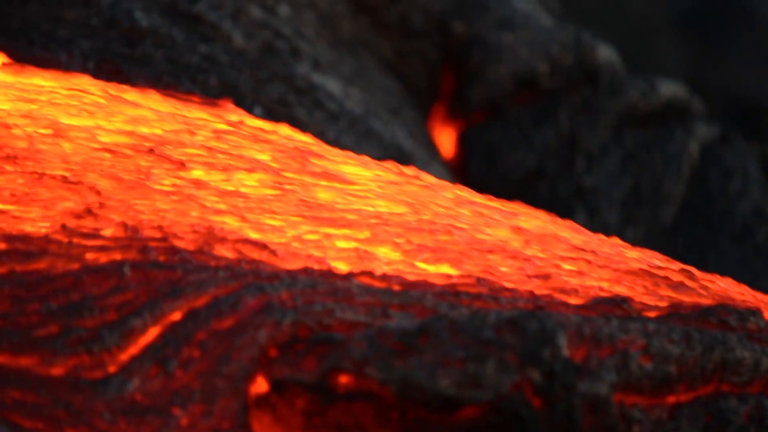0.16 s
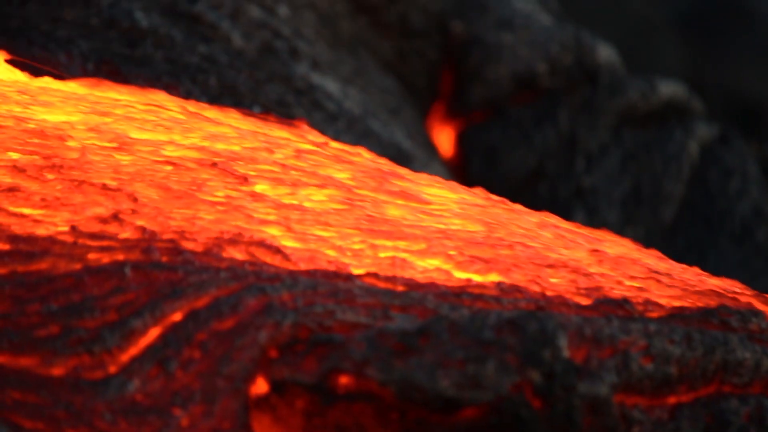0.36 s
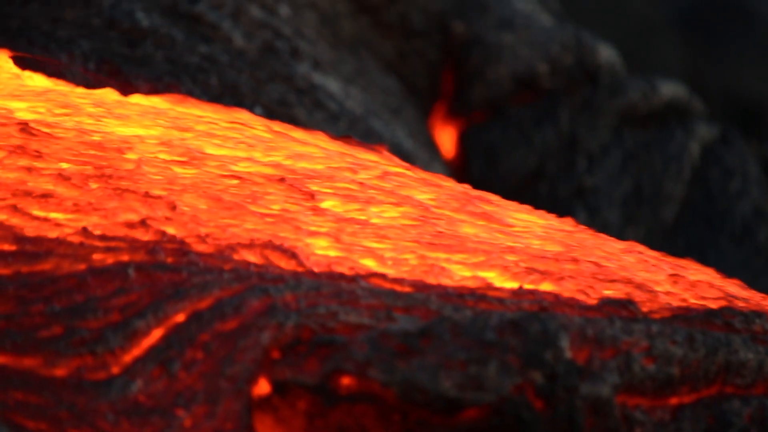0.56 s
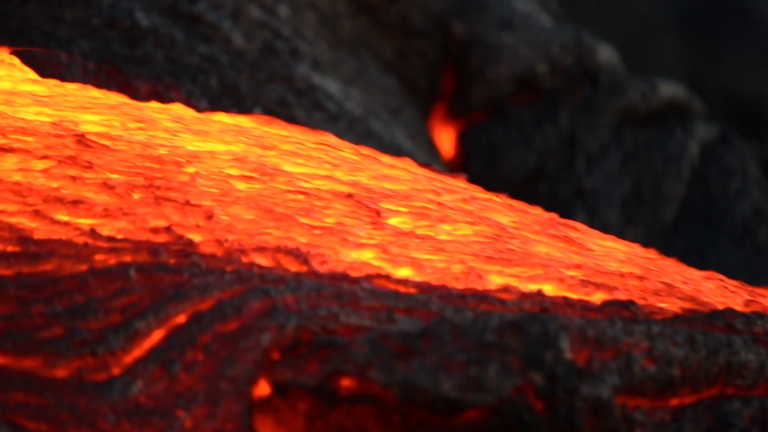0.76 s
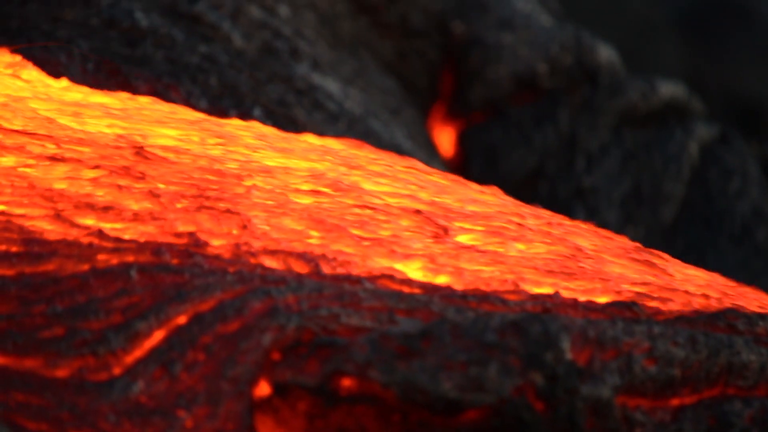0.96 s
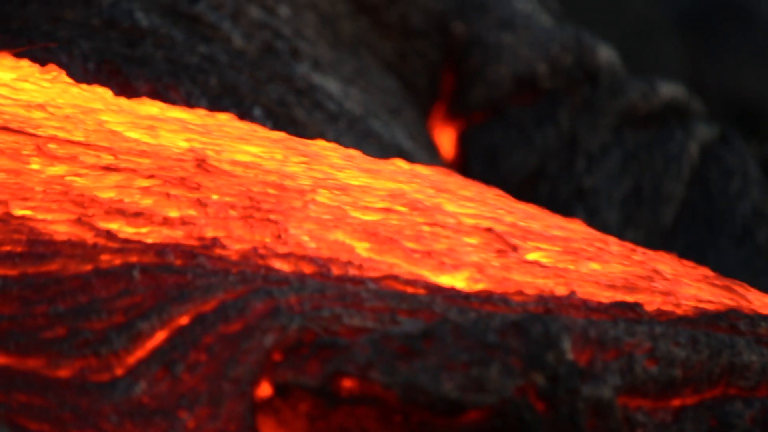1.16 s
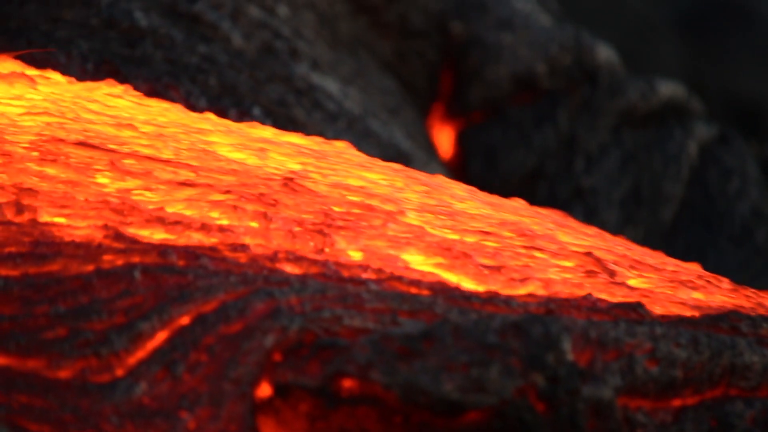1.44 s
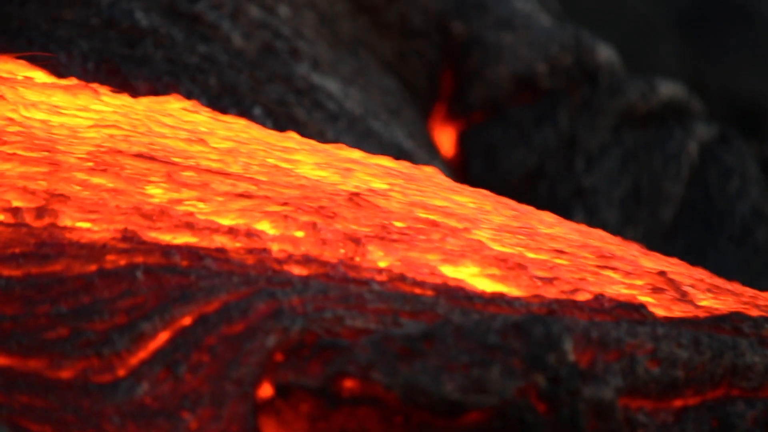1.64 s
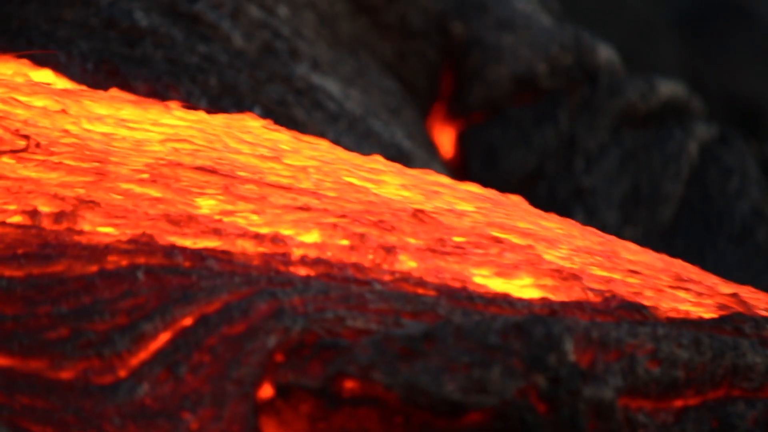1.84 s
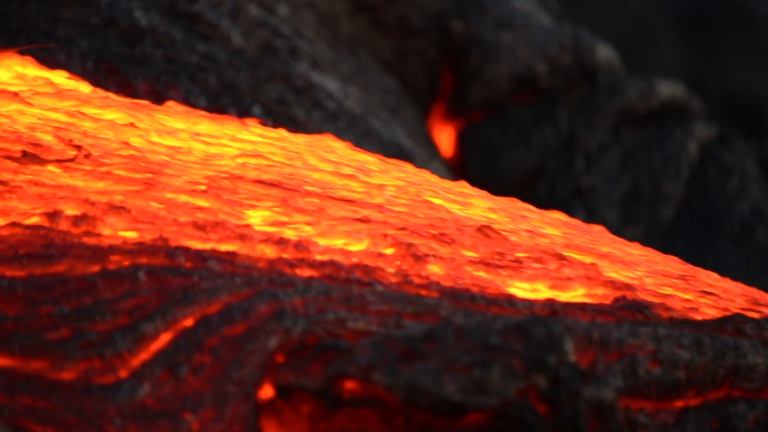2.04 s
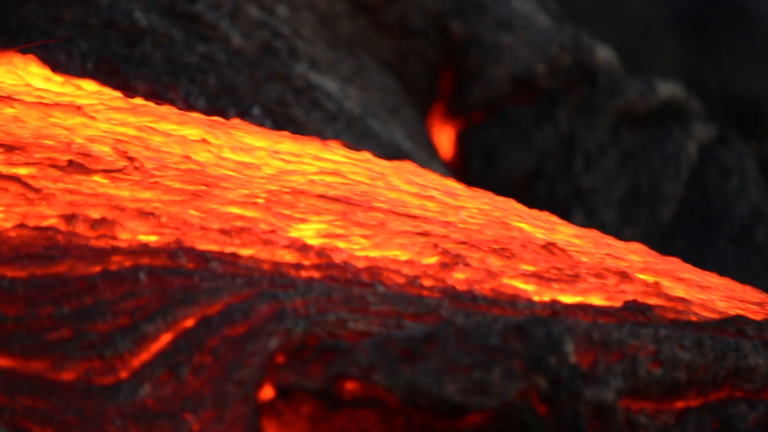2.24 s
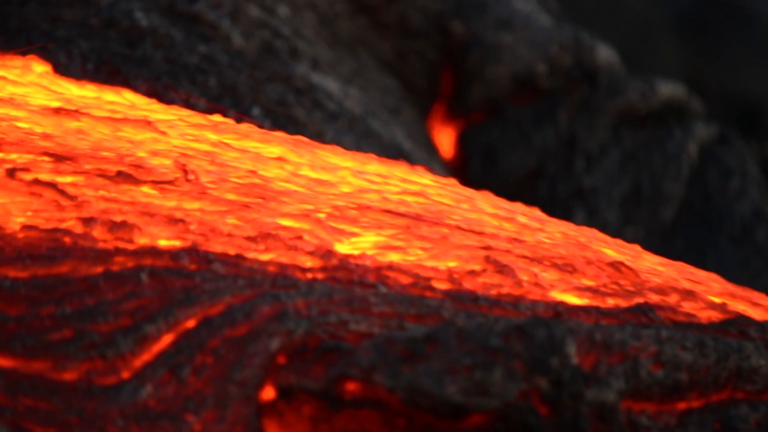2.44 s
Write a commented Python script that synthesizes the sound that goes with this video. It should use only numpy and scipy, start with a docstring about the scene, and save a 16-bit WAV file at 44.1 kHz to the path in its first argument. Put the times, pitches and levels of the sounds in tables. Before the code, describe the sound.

Brittle glassy lava crust clicks and snaps irregularly close by, with faint hiss and low wind buffeting

```python
"""Close to a lava flow in the open: the cooling glassy crust snaps in short dry cracks.
Each crack is an impulse, a noise burst and a rattle, passed through filters at its own pitch.
Under them lie tiny ticks, made of random short noise bursts, and a faint hiss of shaped noise.
Gusty wind buffets the microphone as a deep rumble: low noise whose level rises and falls."""
import sys
import numpy as np
from scipy import signal
from scipy.fft import rfft, irfft
from scipy.io import wavfile
from scipy.ndimage import uniform_filter1d

SR = 44100
rng = np.random.default_rng(int(sys.argv[2]) if len(sys.argv) > 2 else 0)


def makeup_ratio(level_db):
    """Linear amplitude ratio for a level in decibels (20 dB per factor of ten)."""
    decades = np.asarray(level_db, float) / 20
    return 10 ** decades


def materialize(psi):
    """Save the field psi as 16-bit PCM at rate SR to the path in sys.argv[1].

    A 1-D psi becomes a single channel; in a 2-D psi each row is a channel.
    """
    bounded = np.clip(np.atleast_2d(psi).T, -1, 1)
    quanta = np.round(bounded * 32767).astype(np.int16)
    wavfile.write(sys.argv[1], SR, quanta)


N = 113778  # length of the scene in samples

# Single snaps of the crust; the level is before CRACK_BOOST_DB, the edge is against the body,
# the length is before DECAY_SHARE: start_s [s], level_db [dB], pitch_hz [Hz], edge_db [dB], length_ms [ms]
CRACK_EVENTS = [(0.012, -35, 5800, 0, 1.5), (0.0175, -49, 6100, -11, 4.2), (0.0303, -49, 4500, -13, 4.7),
                (0.0422, -48.5, 6400, -8, 5.6), (0.05, -47, 5400, -1, 3), (0.089, -56, 4870, -16, 0.46),
                (0.1193, -37.5, 4500, -15, 0.23), (0.1232, -38.5, 7100, -2, 1.2),
                (0.13, -54, 6700, -13, 1.9), (0.15, -52, 3870, 2, 2), (0.2124, -35, 4300, -1, 0.15),
                (0.2414, -41, 3200, -10, 1.3), (0.2678, -49, 6800, -11, 0.53),
                (0.307, -50.5, 4100, -13, 2.3), (0.3511, -48, 2400, -22, 3.1), (0.3974, -51, 3730, -3, 1.3),
                (0.4122, -51, 4900, -20, 0.9), (0.4642, -27, 4400, 4, 0.21), (0.4707, -52, 6100, 1, 0.9),
                (0.4756, -55, 4000, 9, 2.8), (0.482, -50, 7400, 0, 1.4), (0.4886, -52, 5300, 4, 1.0),
                (0.5574, -46.5, 5130, 3, 0.9), (0.6262, -45, 6600, -3, 1.1), (0.61, -52, 7100, -14, 0.8),
                (0.739, -53, 5500, -7, 0.8), (0.673, -51, 5100, -16, 1.0), (0.6878, -43, 5360, -2.5, 0.52),
                (0.709, -52, 5600, -5, 1.7), (0.743, -49, 5300, -12, 0.98), (0.7539, -47, 3700, -3, 1.3),
                (0.7756, -55, 5100, 1, 3.7), (0.791, -51, 4400, -4, 2.1), (0.813, -50, 5000, -16, 0.77),
                (0.8478, -47, 3600, -1, 1.2), (0.869, -51.5, 3040, -3, 5), (0.8862, -48, 2670, 7, 2.7),
                (0.9378, -43.5, 4800, 16, 0.9), (0.945, -57, 5600, -3, 4.7), (0.954, -44, 4650, -5, 2.2),
                (0.974, -46.5, 5100, -13, 3.6), (0.978, -51, 6100, 7, 2.4), (1.035, -50, 6700, -1, 0.9),
                (1.063, -42.5, 6800, -13, 0.3), (1.0642, -36.5, 5330, -3.5, 0.2),
                (1.0674, -54.5, 2500, -21, 0.48), (1.0955, -40, 7000, -3, 0.15),
                (1.1115, -30.5, 4530, -14, 0.32), (1.165, -52, 4500, 3, 1.3), (1.2155, -46, 4430, -15, 0.7),
                (1.2462, -47, 6550, -9, 0.7), (1.3493, -30, 3260, -8, 0.78), (1.356, -48, 5800, -3, 2.1),
                (1.355, -32.5, 7460, -15, 0.86), (1.3576, -41, 6300, -10, 1.7), (1.376, -50, 4200, -11, 3),
                (1.4162, -51, 6260, -6, 0.9), (1.4206, -48, 6100, -4, 0.8), (1.5584, -53, 6430, -15, 0.8),
                (1.576, -54, 2500, -1, 2), (1.5892, -56, 6500, 1, 1.8), (1.7191, -31, 3360, -7, 2.2),
                (1.7204, -33.5, 3250, 7, 0.51), (1.7229, -30.5, 2440, 5, 1.27),
                (1.7613, -49, 4200, -13, 4.8), (1.784, -54, 4560, -16, 2), (1.788, -45.5, 3100, -17, 0.9),
                (1.797, -45.5, 5800, -3, 7), (1.908, -56, 6050, -8, 5.5), (1.9135, -48, 3100, -27, 3),
                (1.9228, -50, 6030, -6, 4), (1.9262, -51.5, 2150, -23, 2.3), (1.952, -54, 6500, -15, 1.2),
                (1.964, -56, 5500, -12, 3), (1.972, -49, 5540, -12, 2.2), (1.9873, -48.5, 5740, -17, 4),
                (1.9885, -50, 2900, -20, 3), (2.0188, -49.5, 1750, -20, 2.5), (2.027, -51, 3300, -7, 6.5),
                (2.018, -44.5, 4600, 9, 3.3), (2.038, -54, 5760, -12, 2.0), (2.041, -53, 2150, -23, 3.1),
                (2.042, -49, 6500, -9, 1.2), (2.065, -52, 4800, -18, 1), (2.126, -45, 3440, -15, 0.91),
                (2.143, -55, 4800, -10, 2.2), (2.147, -45, 3900, -2, 1), (2.1732, -48, 6150, 5, 0.84),
                (2.1761, -42.5, 3700, -9, 0.7), (2.235, -47.5, 4600, -13, 1.1),
                (2.247, -48, 6900, -12, 0.93), (2.313, -53.5, 4870, -19, 0.91), (2.459, -48, 3780, -5, 4),
                (2.48, -46, 3620, -3, 3.3), (2.54, -49, 2680, -20, 0.96)]
# Wind strength over time, before each pitch region takes its share of the swing: time_s [s], level_db [dB]
WIND_GUSTS = [(0.0, -18), (.07, -27), (.14, -22), (.24, -24.5), (.36, -28.5), (.48, -23), (.54, -27.5),
              (.645, -22.5), (.71, -27), (.86, -23.5), (.97, -28), (1.11, -21.5), (1.21, -25),
              (1.31, -22.5), (1.4, -24.5), (1.8, -25.5), (1.93, -25.5), (2.04, -29), (2.13, -32),
              (2.21, -24), (2.27, -23), (2.38, -28.5), (2.45, -24), (2.58, -25.5)]
# Tone colour of the wind, only the shape counts: pitch_hz [Hz], relative_db [dB per Hz]
WIND_COLOUR = [(15, -2.5), (30, -17.5), (60, -3.5), (100, 0.5), (240, -0.73), (300, -6), (370, -14.5),
               (520, -33), (800, -45), (1300, -54), (4500, -73)]
# How strongly each pitch region follows the gusts: pitch_hz [Hz], share [dB per dB]
WIND_REACH = [(30, 0.3), (130, 2.54), (280, 1.12), (1500, 1.3)]
# Activity of the crust, which moves ticks and hiss: time_s [s], level_db [dB]
CRUST_ACTIVITY = [(0.0, -68.5), (.08, -69.5), (.5, -69.5), (.7, -66.5), (.82, -64), (1.05, -68),
                  (1.5, -71.5), (1.75, -67.5), (1.88, -73), (2.0, -68), (2.2, -71), (2.4, -67.5),
                  (2.58, -65)]
# Tone colour of the hiss, only the shape counts: pitch_hz [Hz], relative_db [dB per Hz]
HISS_COLOUR = [(500, -16.5), (1200, 2), (3000, 0.5), (6900, -1.5), (9400, -12.5), (15200, -13),
               (16500, -19)]
# One band for each size of flake: pitch_hz [Hz], width_hz [Hz], relative_db [dB]
FLAKE_BANDS = [(1640, 300, 0.5), (2190, 700, 2.5), (3100, 900, 3.5), (4100, 840, -2), (5400, 1400, 3),
               (6800, 780, 1.5), (9600, 3300, -1), (14000, 3000, -7)]

CRACK_BOOST_DB = 3.5  # added to every crack
SNAP_DB, TAIL_DB, TAIL_MS = 13.5, -29, 10  # first impulse and rattle, against the burst
DECAY_SHARE = 0.94  # time constant of the burst, as a share of the crack's length
BODY_OCTAVES, RING_OCTAVES = 1.68, 0.18  # widths of the two filters around the pitch
EDGE_BAND_HZ, KNOCK_BAND_HZ = (10700, 17900), (1040, 2880)
KNOCK_DB, KNOCK_DB_PER_OCTAVE = 3, -30  # knock of a 3 kHz crack; higher cracks knock less
RING_DB, RING_PER_EDGE = -13.5, 0.44  # a duller edge rings more, dB per dB
TICKS_PER_S = 1500  # all bands together
TICK_SPREAD_DB, TICK_CLUMP_DB, TICK_CAP_DB, TICK_MS = 5, 2, 15.5, 1
ACTIVITY_MEAN_DB, HISS_FOLLOWS, TICKS_FOLLOW = -67.5, 0.38, 1.3  # follow the activity, dB per dB
HISS_DB, HISS_FLICKER_DB = -4, 1.25  # HISS_DB is against the mean activity level
GUST_MEAN_DB, WIND_FLICKER_DB = -24.5, 0.5


def unit(x):
    """Scale to rms 1."""
    return x / np.sqrt(np.mean(x ** 2))


def curve(table):
    """Draw straight lines between (s, dB) rows to get a level for every sample."""
    return np.interp(np.arange(N) / SR, *np.array(table).T)


def walk(rate):
    """Random levels held 1 / rate s and smoothed twice, with rms 1."""
    hold = int(SR / rate)
    steps = np.repeat(rng.standard_normal(N // hold + 1), hold)
    smooth = uniform_filter1d(uniform_filter1d(steps, hold), hold)
    return unit(smooth[:N])


def around(hz, octaves):
    """Lower and upper edge in Hz of a band this wide, centred on a pitch."""
    return hz * 2 ** (np.array([-.5, .5]) * octaves)


def band_pass(order, edges_hz, x):
    """Let mainly the sound between two edges through."""
    return signal.sosfilt(signal.butter(order, edges_hz, "bp", fs=SR, output="sos"), x)


def cracks():
    """A sudden push sets off a pitched body, a narrow ring, a low knock and a bright edge."""
    out = np.zeros(N + 1024)
    ms = np.arange(1024) / SR * 1000
    noises = rng.standard_normal((len(CRACK_EVENTS), 1024))
    for (start_s, level_db, hz, edge_db, length_ms), noise in zip(CRACK_EVENTS, noises):
        burst = np.exp(-ms / length_ms / DECAY_SHARE)
        rattle = makeup_ratio(TAIL_DB) * np.exp(-ms / TAIL_MS)
        push = noise * (burst + rattle)
        push[0] = makeup_ratio(SNAP_DB)
        body = unit(band_pass(2, around(hz, BODY_OCTAVES), push))
        edge = unit(band_pass(2, EDGE_BAND_HZ, push))
        knock = unit(band_pass(2, KNOCK_BAND_HZ, push))
        ring = unit(band_pass(1, around(hz, RING_OCTAVES), push))
        knock_db = KNOCK_DB + KNOCK_DB_PER_OCTAVE * np.log2(hz / 3000)
        ring_db = RING_DB - RING_PER_EDGE * edge_db
        crack = body + makeup_ratio(edge_db) * edge + makeup_ratio(knock_db) * knock + makeup_ratio(ring_db) * ring
        peak = makeup_ratio(level_db + CRACK_BOOST_DB)
        out[int(start_s * SR):][:1024] += peak * crack / abs(crack).max()
    return out[:N]


def ticks():
    """Countless tiny flakes pop off in clumps, each size of flake in its own band."""
    out = 0
    fade = np.exp(-np.arange(256) / SR * 1000 / TICK_MS)
    for hz, width_hz, relative_db in FLAKE_BANDS:
        pops = rng.random(N) < TICKS_PER_S / len(FLAKE_BANDS) / SR
        pop_db = TICK_SPREAD_DB * rng.exponential(size=N) + TICK_CLUMP_DB * walk(60)
        sizes = pops * makeup_ratio(np.minimum(pop_db, TICK_CAP_DB))
        bursts = np.convolve(sizes, fade)[:N] * rng.standard_normal(N)
        band = band_pass(1, [hz - width_hz / 2, hz + width_hz / 2], bursts)
        out = out + makeup_ratio(relative_db) * unit(band)
    level_db = ACTIVITY_MEAN_DB + TICKS_FOLLOW * (curve(CRUST_ACTIVITY) - ACTIVITY_MEAN_DB)
    return makeup_ratio(level_db) * unit(out)


def airy(colour, shared_db, flicker_db, rate, band_level_db):
    """Coloured noise in half-octave bands that swell together, flicker alone and get their own level."""
    octave = np.log2(np.maximum(np.arange(N // 2 + 1) * SR / N, 1))  # octaves above 1 Hz
    hz, relative_db = np.array(colour).T
    shape_db = np.interp(octave, np.log2(hz), relative_db, left=-90, right=-120)
    noise = rfft(rng.standard_normal(N)) * makeup_ratio(shape_db)
    swell_db = shared_db * walk(rate)
    plain, levelled = 0, 0
    for centre in np.arange(3.5, 15, .5):
        overlap = np.clip(1 - 2 * abs(octave - centre), 0, 1)  # neighbouring bands fade into each other
        band = irfft(noise * overlap, N) * makeup_ratio(swell_db + flicker_db * walk(rate))
        plain = plain + band
        levelled = levelled + band * makeup_ratio(band_level_db(centre))
    return levelled / np.std(plain)


def hiss():
    """Faint shaped noise that partly follows the activity of the crust."""
    activity_db = curve(CRUST_ACTIVITY) - ACTIVITY_MEAN_DB
    level_db = ACTIVITY_MEAN_DB + HISS_FOLLOWS * activity_db + HISS_DB
    return airy(HISS_COLOUR, HISS_FLICKER_DB, HISS_FLICKER_DB, 29.0, lambda octave: level_db)


def wind():
    """Gusts buffet the microphone as low noise; each pitch region takes its own share of the swing."""
    gust_db = curve(WIND_GUSTS) - GUST_MEAN_DB
    hz, share = np.array(WIND_REACH).T

    def level_db(octave):
        """Level over time of the band at this octave."""
        return GUST_MEAN_DB + gust_db * np.interp(octave, np.log2(hz), share)

    return airy(WIND_COLOUR, WIND_FLICKER_DB, WIND_FLICKER_DB, 13.9, level_db)


def scene():
    """Wind, hiss, ticks and cracks add up at one microphone."""
    return (wind() + hiss() + ticks() + cracks())[None]


def roll_off(x):
    """The treble ends steeply here."""
    return signal.sosfilt(signal.butter(12, 16650, fs=SR, output="sos"), x)


def record(dry):
    """A steep low-pass filter cuts the top above 15950 Hz."""
    low_pass = signal.ellip(6, .3, 40, 15950, fs=SR, output="sos")
    dull = signal.sosfilt(low_pass, dry)
    return roll_off(dull)


dry = scene()
out = record(dry)
materialize(out)
```